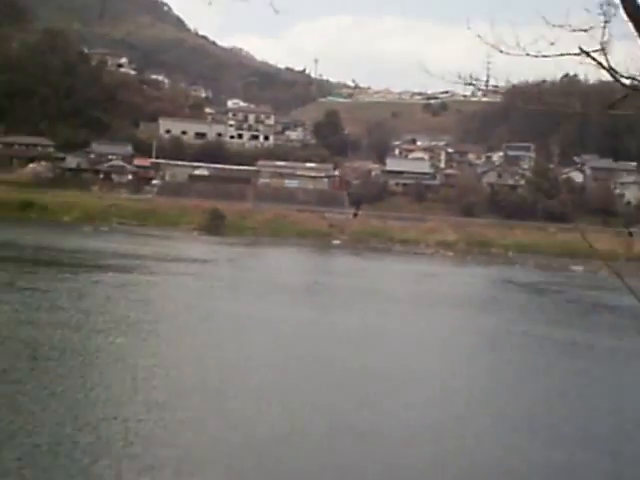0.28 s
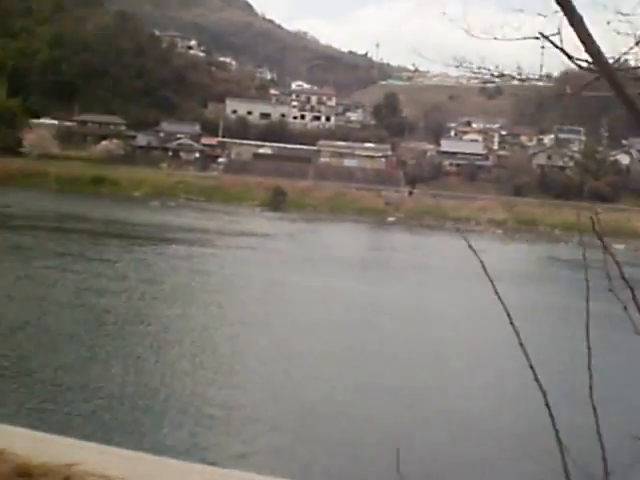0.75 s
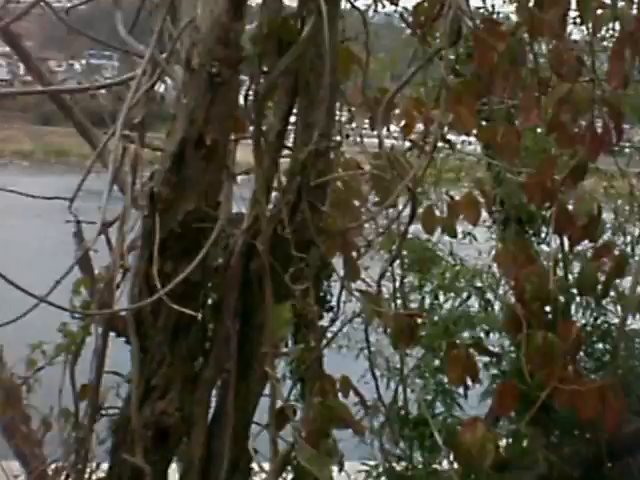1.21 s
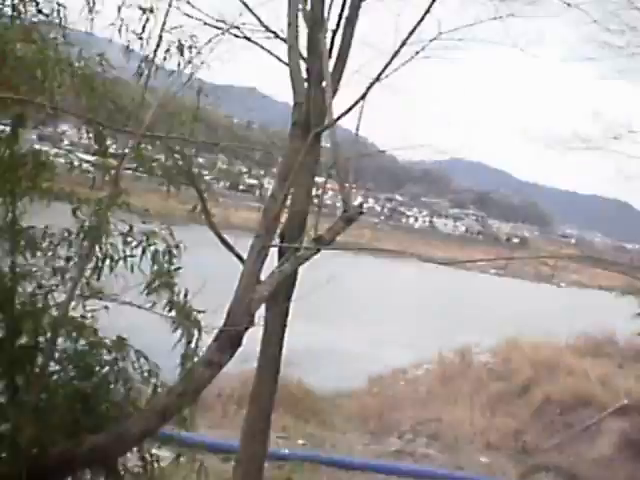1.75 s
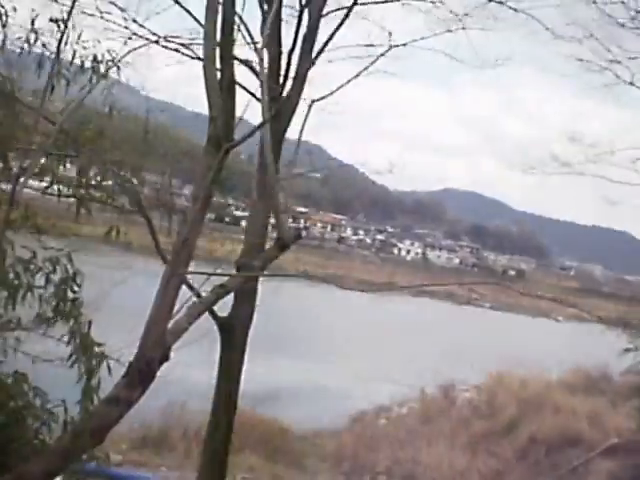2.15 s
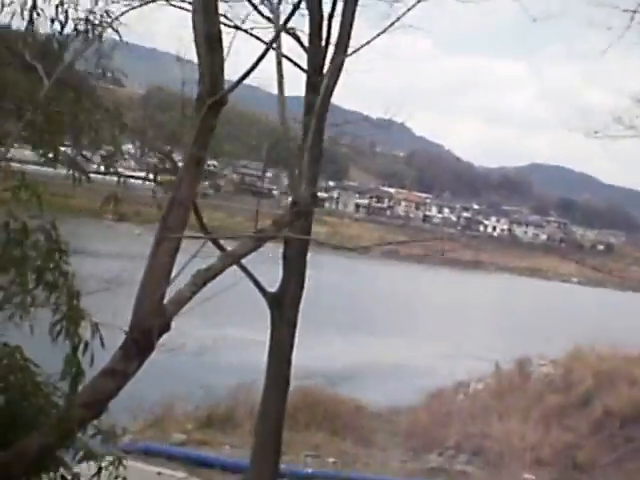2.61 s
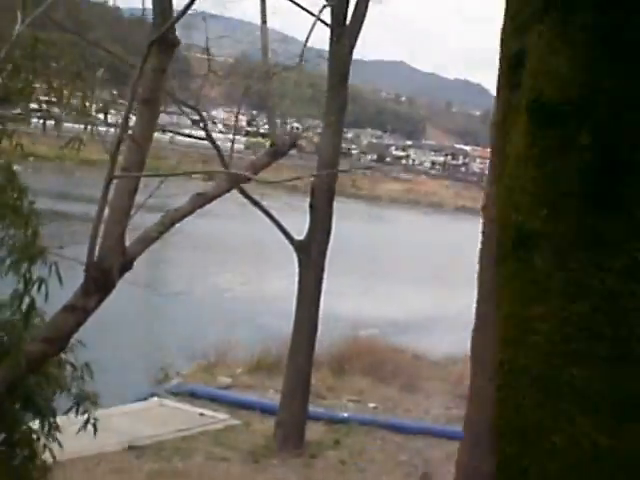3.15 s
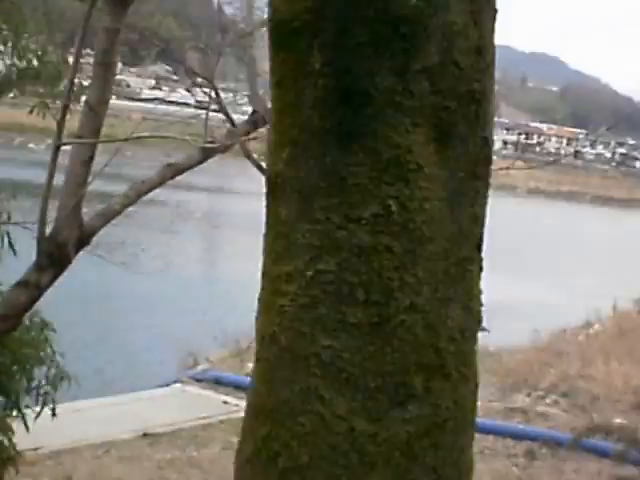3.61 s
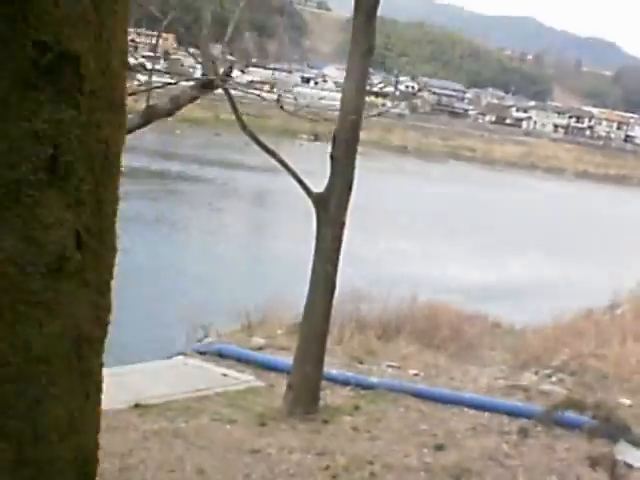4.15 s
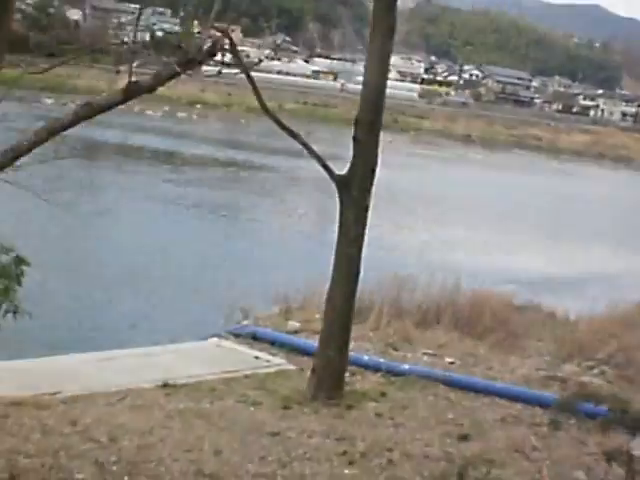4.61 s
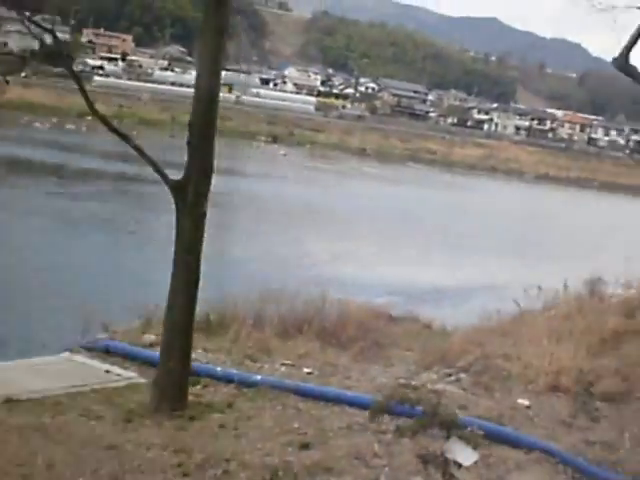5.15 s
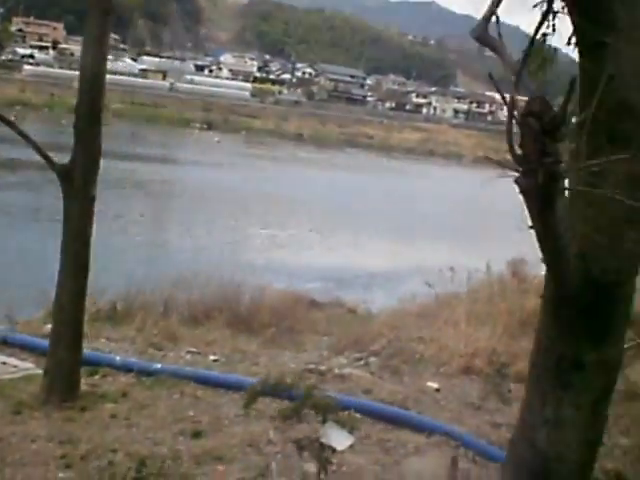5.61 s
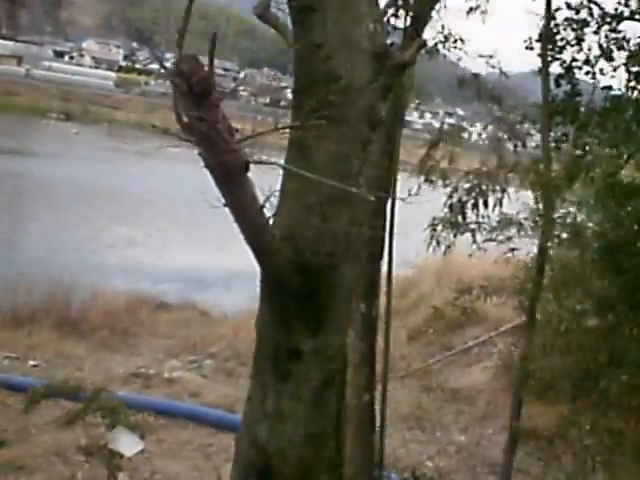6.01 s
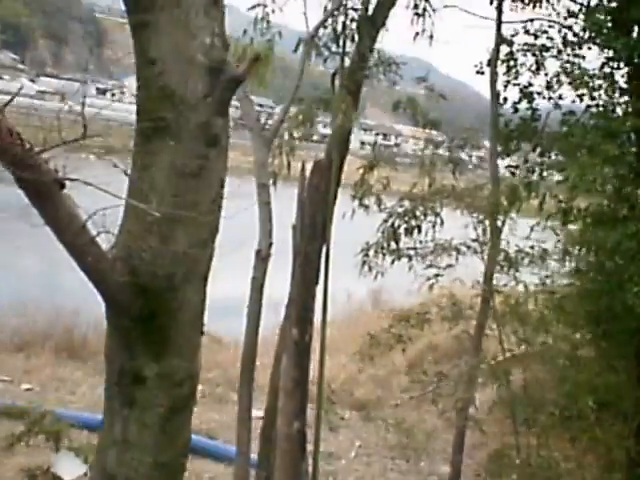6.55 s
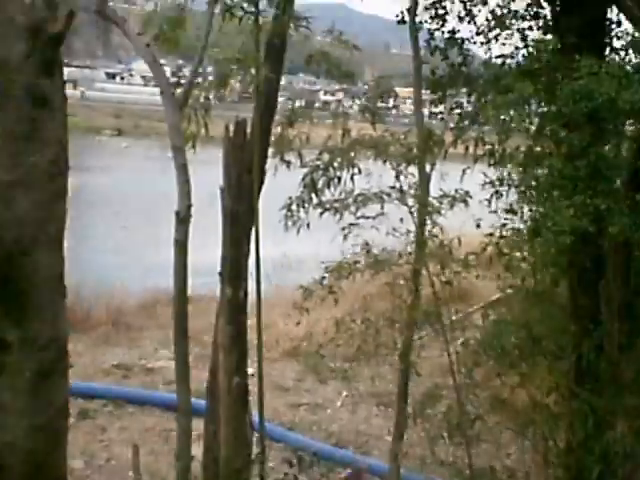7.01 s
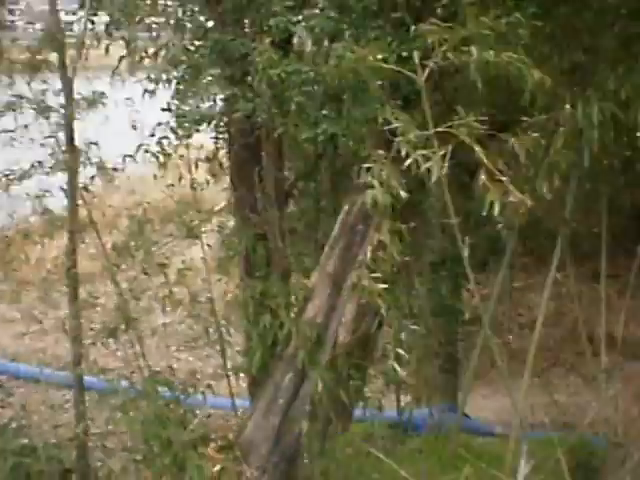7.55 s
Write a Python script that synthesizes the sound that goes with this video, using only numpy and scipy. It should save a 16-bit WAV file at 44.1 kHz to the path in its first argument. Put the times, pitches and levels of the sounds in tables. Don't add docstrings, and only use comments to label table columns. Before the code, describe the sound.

Steady broad river hiss and low rumble lie beneath dry, splintery footfalls. Thin stems tick and thick stalks crack with a bright ring and dull knock, in loose clumps with quiet gaps. Wind briefly buffets the microphone near the beginning. The hardest crunches, around three and four and a half seconds, clip and pop; afterwards breaks are sparser while the water grows nearer. Open air, narrow-band small device, almost no echo.

```python
import sys
import numpy as np
from scipy import signal
from scipy.fft import rfft, irfft, next_fast_len
from scipy.io import wavfile

SR = 44100
rng = np.random.default_rng(int(sys.argv[2]) if len(sys.argv) > 2 else 0)


def decibels_to_gain(level_db):
    exponent = np.asarray(level_db, float) / 20
    return 10 ** exponent


def persist_wave(psi):
    counts = np.round(np.clip(psi, -1, 1) * 32767).astype(np.int16)
    wavfile.write(sys.argv[1], SR, np.atleast_2d(counts).T)


N = 343310

# (time [s], crunch level [dB], swell [ms per 20 dB], fade [ms per 20 dB])
CLUMPS = [(0.023, -32.5, 18, 69), (3.86, -35.5, 29, 80), (0.372, -32, 37, 50), (0.861, -32.5, 43, 59),
          (1.349, -18.5, 31.5, 15.5), (1.41, -30, 84.5, 68), (1.643, -20.5, 3, 12.5), (1.77, -13.5, 2, 15),
          (1.871, -27, 22, 36.5), (1.91, -27, 18, 45.5), (2.368, -29.5, 38, 20.5), (2.409, -21, 8.5, 33.5),
          (2.677, -25, 3.5, 15.5), (2.904, -15, 51, 28.5), (2.925, -18, 29.5, 60.5), (3.261, -5, 5.5, 29.5),
          (3.288, -11, 43.5, 31.5), (3.34, -17, 55.5, 18), (4.349, -27.5, 35, 57.5), (4.373, -9.5, 4.5, 15),
          (4.391, -8.5, 6.5, 21), (4.426, -13, 10.5, 8.5), (4.542, -35, 86, 33.5), (4.851, -28.5, 57, 15.5),
          (4.884, -30.5, 51, 58), (5.345, -28.5, 69, 9), (5.371, -21, 14, 25), (6.383, -25, 42.5, 38.5),
          (6.9, -27, 86.5, 42), (7.41, -26, 51, 29.5)]


def rms_one(x):
    return x / np.sqrt(np.mean(x ** 2) + 1e-20)


def in_time(rows):
    s, *columns = np.transpose(rows)
    return [np.interp(np.arange(N) / SR, s, column) for column in columns]


def at_hz(points, hz):
    point_hz, point_db = np.transpose(points)
    return np.interp(np.log(hz), np.log(point_hz), point_db)


def coloured(white, spectrum):
    size = next_fast_len(N)
    hz = np.maximum(np.arange(size // 2 + 1) * SR / size, 1)
    nearest_hz = np.clip(hz, spectrum[0][0], spectrum[-1][0])
    gain_db = at_hz(spectrum, hz) - 12 * np.abs(np.log2(hz / nearest_hz))
    return rms_one(irfft(rfft(white, size) * decibels_to_gain(gain_db), size)[:N])


def noise(spectrum):
    return coloured(rng.standard_normal(N), spectrum)


def band_pass(x, low_hz, high_hz):
    return signal.sosfilt(signal.butter(2, [low_hz, high_hz], "band", fs=SR, output="sos"), x)


def drift(rate_hz):
    hop = 40
    settle = 2000
    pole = np.exp(-2 * hop * np.pi * rate_hz / SR)
    white = rng.standard_normal(N // hop + settle + 2)
    slow = signal.lfilter([1], [1, -2 * pole, pole * pole], white)[settle:]
    return np.interp(np.arange(N) / hop, np.arange(len(slow)), rms_one(slow))


def add(out, s, shape):
    at = round(s * SR) - len(shape) // 2 + np.arange(len(shape))
    inside = (at >= 0) & (at < N)
    out[at[inside]] += shape[inside]


def river(flicker_db):
    # (time [s], hiss level [dB])
    nearness = [
        (0.0, -37),
        (0.9, -37),
        (1.85, -33.5),
        (2.1, -36),
        (3.4, -34.5),
        (4.5, -35),
        (6.3, -32.5),
        (7.78, -30.5),
    ]
    # (time [s], level [dB])
    breeze = [(0.0, -44), (0.69, -41.5), (1.0, -40), (1.43, -36), (1.6, -47.5), (2.1, -45.5), (2.62, -52.5),
              (3.25, -48.5), (4.5, -52.5), (6.3, -48.5), (7.78, -46)]
    # (frequency [Hz], density [dB per Hz])
    hiss_spectrum = [(150, -16), (300, -6), (600, -3), (900, -2.5), (1300, -2), (1800, -7.5), (2400, -7),
                     (3000, -9.5), (3700, -12), (4300, -31), (5000, -25)]
    # (frequency [Hz], density [dB per Hz])
    rumble_spectrum = [(80, -24.5), (120, -3), (160, -2), (200, 0), (280, -5), (450, -18.5)]
    # (frequency [Hz], density [dB per Hz])
    air_spectrum = [(20, -7), (40, -3.5), (70, 1.5), (100, 1.5), (140, -11), (220, -23.5)]
    rumble_mean_db, rumble_follows, buffeting_db = -44, 1, -10

    hiss_db, = in_time(nearness)
    air_db, = in_time(breeze)
    hiss = decibels_to_gain(hiss_db + flicker_db * drift(18)) * noise(hiss_spectrum)
    rumble_db = rumble_mean_db + rumble_follows * (hiss_db - hiss_db.mean()) + 1.5 * drift(2.4)
    low = decibels_to_gain(rumble_db) + decibels_to_gain(gust_level_db() + buffeting_db)
    rumble = low * noise(rumble_spectrum)
    air = decibels_to_gain(air_db + 2.0 * drift(7.9)) * noise(air_spectrum)
    return hiss + rumble + air


def crunch(breaks_per_s, size_db, clump_db):
    # (frequency [Hz], density [dB per Hz])
    litter_spectrum = [(300, -35), (900, -8.5), (1270, -7), (1900, -11.5), (2300, -5), (2600, -4),
                       (3000, -8), (3500, -5), (4000, -13.5), (4600, -16)]
    rustle_db, rustle_wander_db = -41, 1

    pressed, ms = np.zeros(N), np.arange(-8000, 8001) * 1000 / SR
    for s, crunch_db, swell_ms, fade_ms in CLUMPS:
        slope_ms = np.where(ms < 0, swell_ms, fade_ms)
        add(pressed, s, decibels_to_gain(crunch_db - 20 * np.abs(ms) / slope_ms))
    sizes = decibels_to_gain(size_db * np.minimum(rng.exponential(1, N), 4)) * rng.choice([-1, 1], N)
    born = rng.random(N) < breaks_per_s / SR
    rustle = decibels_to_gain(rustle_db + rustle_wander_db * drift(3))
    load = rustle + pressed * decibels_to_gain(clump_db * drift(80) - 4.0)
    return load * coloured(sizes * born, litter_spectrum)


def breaks():
    # (time [s], peak level [dB], dull part relative to peak [dB])
    stalks = [(0.0216, -8.5, -24), (0.3017, -8, -20), (0.3174, -6, -24), (0.8903, -5, -25),
              (1.2027, -7.5, -8.5), (1.3485, -1.5, -18), (1.6439, -5, -4.5), (1.7684, -4.5, -8.5),
              (1.7714, -1, -16), (2.4086, -6, -32), (2.9054, 1.5, -10.5), (2.917, -2, -34),
              (3.2605, 2, -14.5), (3.2649, 0.5, -16), (3.2877, -2.5, -10), (3.2948, 0, -16),
              (3.3414, -12.5, -2), (4.372, 3.5, -6), (4.391, 6.5, -14), (4.3957, -1.5, -17.5),
              (4.426, -1, -19), (4.532, -3, -27), (4.5832, -5, -22), (4.8085, -8.5, -7), (4.8525, -6, -16),
              (5.3479, -5, -29), (5.374, -11, -15), (6.9125, -6, -27), (7.413, -8.5, -11), (7.624, 3, -38)]
    # (time [s], peak level [dB])
    stems = [(0.379, -15.5), (0.7709, -17), (1.096, -14.5), (1.369, -17), (1.6612, -16), (1.788, -9),
             (1.8223, -16), (1.8671, -17), (1.9071, -14.5), (1.9338, -12.5), (2.6409, -15), (2.6775, -20),
             (2.7113, -17), (2.7483, -13), (2.9625, -11), (2.98, -15.5), (3.1739, -17), (3.4407, -17.5),
             (3.8475, -21), (4.3511, -8), (4.543, -13), (4.668, -17.5), (4.6984, -12), (5.2524, -13.5),
             (5.3824, -7.5), (6.3604, -12.5), (6.3817, -11.5), (6.8708, -10), (6.9006, -7), (7.3683, -10.5)]
    # (time [s], peak level [dB])
    more_stems = [(0.2881, -19.5), (0.3935, -19), (0.408, -26.5), (0.8344, -19), (1.0056, -24), (1.3214, -23),
                  (1.3833, -17.5), (1.4267, -22), (1.464, -20), (1.6228, -18), (2.8933, -9.5), (3.1189, -19.5),
                  (3.269, -6), (3.298, 0), (3.377, -16), (4.19, -26), (4.3342, -19), (4.377, -1), (4.5029, -19),
                  (4.8853, -16.5), (4.9264, -19), (5.276, -17), (5.3057, -15), (5.685, -18.5), (6.3418, -21),
                  (6.419, -17.5), (6.6553, -16.5), (6.8429, -12), (7.3806, -14), (7.705, -17)]
    blade_db, blade_spread_db = 11, 4.5
    blade_reach = .65
    thin_dull_db, thin_dull_spread_db = -15.5, 3

    shape = (len(CLUMPS), 6)
    where = rng.uniform(-1, 1, shape) * blade_reach
    s, crunch_db, swell_ms, fade_ms = np.transpose(CLUMPS)[:, :, None]
    blade_s = s + where * np.where(where < 0, swell_ms, fade_ms) / 1000
    peak_db = crunch_db + blade_db - 20 * np.abs(where) + blade_spread_db * rng.standard_normal(shape)
    blades = np.c_[blade_s.ravel(), np.minimum(peak_db.ravel(), -5)]
    thin = np.vstack([stems, more_stems, blades])
    dull_db = thin_dull_db + thin_dull_spread_db * rng.standard_normal(len(thin))
    return np.vstack([stalks, np.c_[thin, dull_db]])


def burst(t, hz, rise_ms, fall_ms, phase):
    spread_s = np.where(t < 0, rise_ms, fall_ms) / 1000
    return np.exp(-.5 * (t / spread_s) ** 2) * np.cos(2 * np.pi * hz * t + phase)


def snaps(rise_ms, fall_ms, dull_hz, after_db, after_ms):
    ring_hz, ring_spread_hz = 3070, 220
    crack_hz, crack_db = 4300, -12.5
    echo_ms, echo_db = 3.7, -13

    out, t = np.zeros(N), np.arange(-700, 701) / SR
    rows = breaks()
    chance = rng.random((len(rows), 4))
    splinters = band_pass(rng.standard_normal((len(rows), len(t))), 2200, 3800)
    fade = decibels_to_gain(after_db) * (t > 0) * np.exp(-1000 * np.abs(t) / after_ms)
    tails = fade * splinters / splinters.std()
    for (s, peak_db, dull_db), (a, b, c, d), tail in zip(rows, chance, tails):
        phase_a, phase_b, phase_c = 2 * np.pi * a, 2 * np.pi * b, 2 * np.pi * c
        ring = burst(t, ring_hz + ring_spread_hz * (2 * d - 1), rise_ms, fall_ms, phase_a)
        crack = decibels_to_gain(crack_db) * burst(t, crack_hz, 0.19, 0.3, phase_b)
        echo = decibels_to_gain(echo_db) * burst(t - echo_ms / 1000, ring_hz, rise_ms, fall_ms, phase_c)
        knock = decibels_to_gain(dull_db - 1.5) * burst(t - .0004, dull_hz * (0.94 + 0.35 * c), 0.66, 0.94, phase_b)
        add(out, s, decibels_to_gain(peak_db + 1.5) * (ring + crack + echo + tail + knock))
    return out


def gust_level_db():
    # (time [s], level [dB])
    gust_points = [
        (0.45, -44),
        (0.668, -36.5),
        (0.76, -28),
        (0.914, -22.5),
        (0.99, -25),
        (1.04, -21.5),
        (1.203, -23),
        (1.27, -35),
        (1.501, -35),
    ]
    return in_time([(0, -73), (.25, -72.5), *gust_points, (1.8, -88)])[0]


def gust(octaves, lump_db):
    level_db = gust_level_db()
    centre_hz = np.maximum(155.7 + 3 * (level_db + 22), 60)
    white, flutter = rng.standard_normal((2, N)), 0
    edges_hz = 35 * 2 ** np.arange(0, 4.1, 1 / 3)
    for k, (low_hz, high_hz) in enumerate(zip(edges_hz, edges_hz[1:])):
        band = rms_one(band_pass(white[k % 2], low_hz, high_hz))
        distance = np.log2(np.sqrt(low_hz * high_hz) / centre_hz) / octaves
        flutter = flutter + band * np.exp(-.5 * distance ** 2)
    return decibels_to_gain(level_db - 6.0 + lump_db * drift(9.9)) * flutter


def overload_pops():
    # (time [s], depth [full scale], length [ms])
    pop_table = [
        (1.6434, 1.25, 0.31),
        (1.7695, 1, 0.38),
        (1.7719, 1.3, 0.23),
        (3.2877, 1.25, 0.32),
        (4.3713, 1.1, 0.27),
        (4.3731, 0.71, 0.42),
        (4.3749, 2.1, 0.38),
        (4.3941, 1.0, 0.19),
        (4.4226, 1.6, 0.32),
    ]
    pops, t = np.zeros(N), np.arange(-100, 101) / SR
    for s, depth, length_ms in pop_table:
        add(pops, s, -depth * np.exp(-(2000 * t / length_ms) ** 4))
    return pops


def scene():
    stems = snaps(rise_ms=.2, fall_ms=.4, dull_hz=1210, after_db=-18, after_ms=3.5)
    litter = crunch(breaks_per_s=3500, size_db=3.6, clump_db=2.8)
    return (stems + litter + river(flicker_db=1.02) + gust(octaves=0.42, lump_db=2.5))[None]


def low_pass(x):
    return signal.sosfilt(signal.butter(12, 15800, fs=SR, output="sos"), x)


def record(dry):
    rail, band_stop_hz, offset, grain_db = .9, 5645, .0027, -92
    dry = dry - 0.26 * signal.lfilter(*signal.iirpeak(3980, 9.0, fs=SR), dry)
    pops = overload_pops()
    drive = dry / rail
    limited = rail * np.tanh(drive + drive ** 3 / 3)
    popped = limited * (1 - np.clip(-pops, 0, 1) * .8) + pops
    edge = signal.cheby2(8, 42, band_stop_hz, fs=SR, output="sos")
    grain = decibels_to_gain(grain_db) * rng.standard_normal(dry.shape)
    held = np.clip(signal.sosfiltfilt(edge, popped) + offset + grain, -.97, .99)
    return low_pass(held)


dry = scene()
out = record(dry)
persist_wave(out)
```